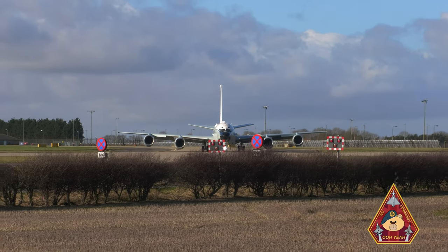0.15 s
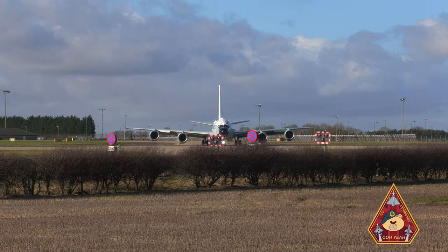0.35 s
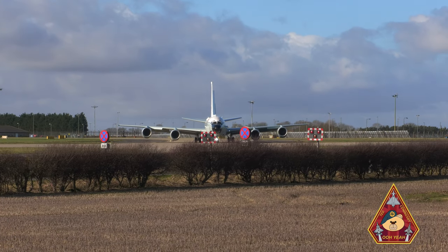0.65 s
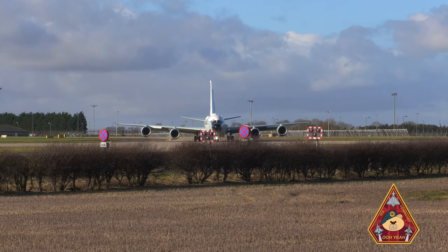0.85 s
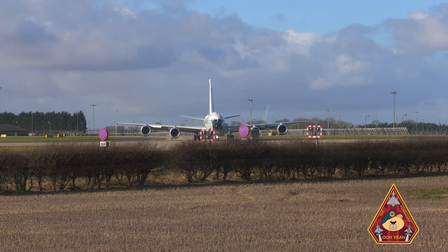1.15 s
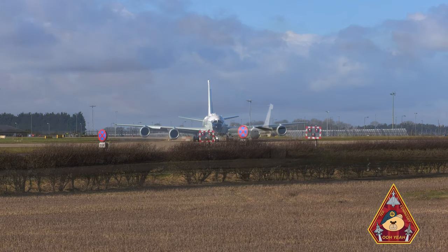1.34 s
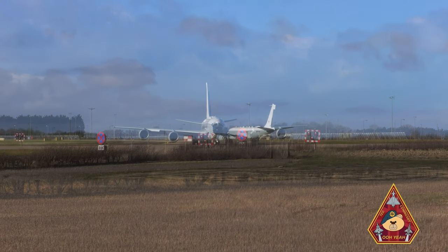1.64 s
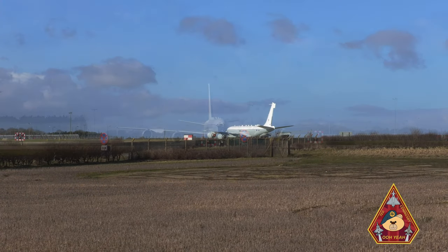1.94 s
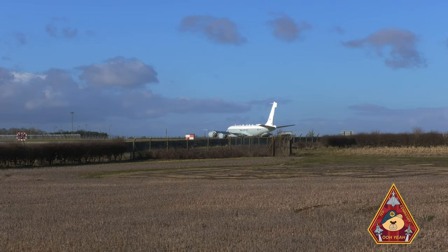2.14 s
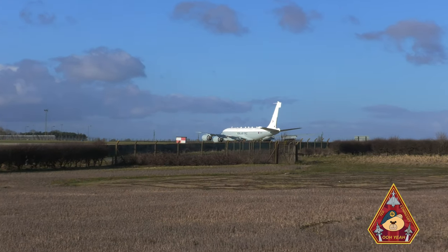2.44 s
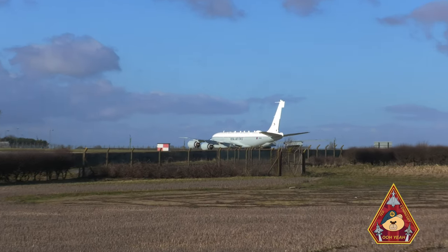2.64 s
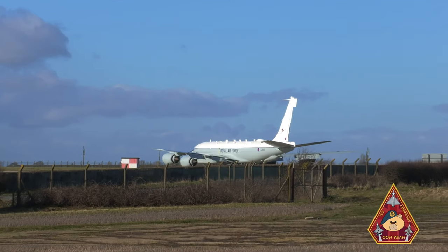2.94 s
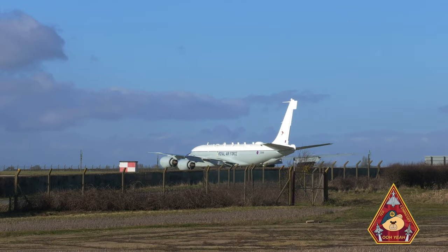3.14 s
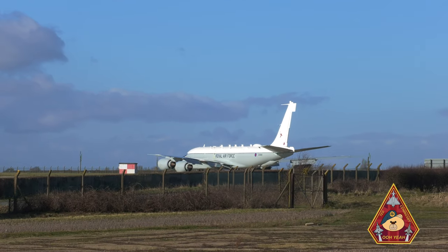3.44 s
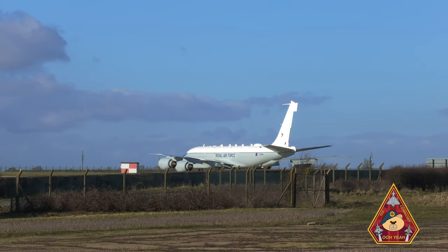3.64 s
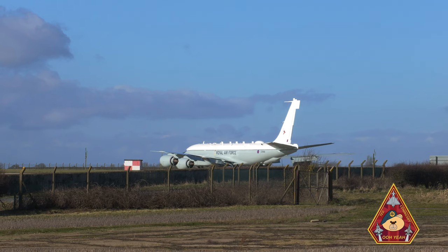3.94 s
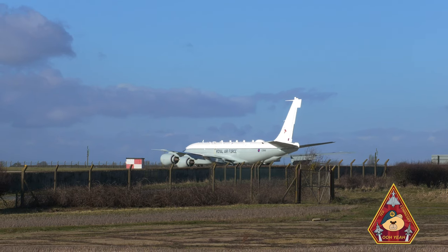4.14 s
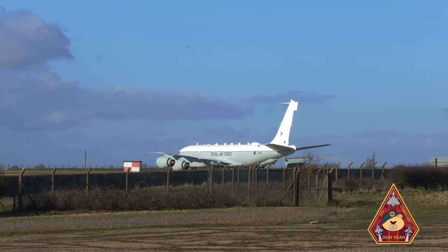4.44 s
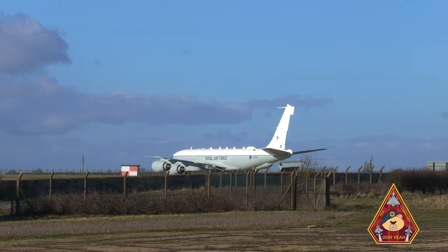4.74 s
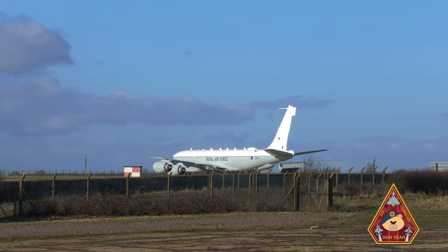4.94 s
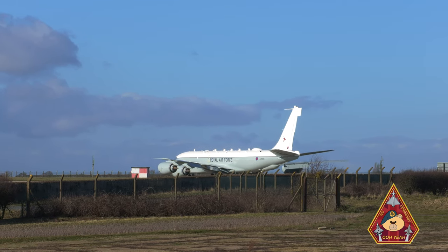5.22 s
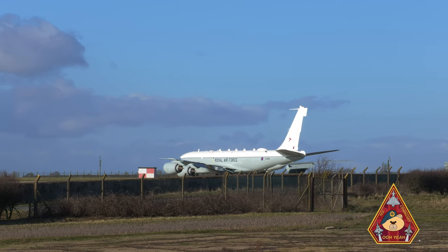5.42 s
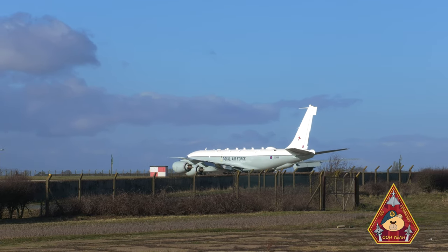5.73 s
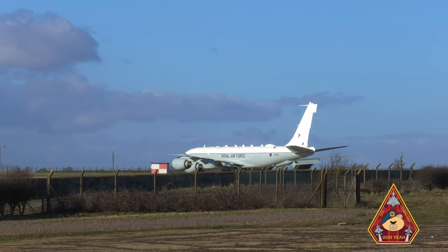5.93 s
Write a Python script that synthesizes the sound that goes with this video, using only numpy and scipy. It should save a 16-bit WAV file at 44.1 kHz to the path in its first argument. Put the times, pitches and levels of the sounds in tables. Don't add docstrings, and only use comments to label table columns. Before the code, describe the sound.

A taxiing four-engine jet heard far across open ground. First comes steady high whine and airy roar, brightening just after one second, then fading as the scene changes. The exhaust side follows, low and rough, with a hum that swells and fades by about five seconds. Wind buffets the unprotected-sounding handheld microphone throughout; dry clicks and rustles grow busier late, and a short bird chirp arrives at the end.

```python
import sys
import numpy as np
from scipy import signal
from scipy.io import wavfile
from scipy.ndimage import uniform_filter1d, minimum_filter1d

SR = 44100
rng = np.random.default_rng(int(sys.argv[2]) if len(sys.argv) > 2 else 0)


def undo_db(level):
    steps = np.asarray(level, float) / 20
    return 10 ** steps


def generate_wav(sig):
    pcm = np.round(np.clip(np.atleast_2d(sig).T, -1, 1) * 32767).astype(np.int16)
    wavfile.write(sys.argv[1], SR, pcm)


N = 268128


def evened(x):
    return x / np.sqrt(np.mean(x ** 2) + 1e-20)


def columns(rows):
    s, *values = np.transpose(rows)
    return [np.interp(np.arange(N) / SR, s, v) for v in values]


def fade(start_s, end_s):
    return np.clip((np.arange(N) / SR - start_s) / (end_s - start_s), 0, 1)


def bell(centre_s, length_s):
    return np.exp(-((np.arange(N) / SR - centre_s) / length_s) ** 2)


def wander(rate_hz):
    slow = signal.butter(2, rate_hz, fs=SR, output="sos")
    return evened(signal.sosfilt(slow, rng.standard_normal(N + SR))[SR:])


def noise(colour, band, patchy_db, tilt_db=np.zeros(N), size=1024):
    hop = size // 4
    frames, hz = N // hop + 5, np.fft.rfftfreq(size, 1 / SR)
    a, b, patches = rng.standard_normal((frames, len(hz), 3)).T
    patches = uniform_filter1d(patches, size=10, axis=0)
    patches = evened(uniform_filter1d(patches, size=14, axis=1))

    f, db = np.transpose(colour)
    f = np.r_[f[0] / 4, f, f[-1] * 3]
    db = np.r_[db[0] - 60, db, db[-1] - 120]
    gain = undo_db(np.interp(np.log(hz + 1), np.log(f), db))
    inside = (hz > band[0]) & (hz < band[1])
    share = np.sqrt(np.sum(gain[inside] ** 2) / np.sum(gain ** 2))

    octaves = np.log2(np.clip(hz[:, None], band[0], 5000) / band[0])
    tilt = tilt_db[np.clip(np.arange(frames) * hop, 0, N - 1)] * octaves
    plain = (a + 1j * b) * gain[:, None] * undo_db(patchy_db * patches)
    overlap = size - hop
    scale = np.std(signal.istft(plain, nperseg=size, noverlap=overlap)[1]) * share
    return signal.istft(plain * undo_db(tilt), nperseg=size, noverlap=overlap)[1][:N] / scale


def tone(hz, db, waver_hz, flutter_db, rate_hz):
    turns = np.cumsum(hz + waver_hz * wander(rate_hz)) / SR + rng.random()
    level = np.sqrt(2) * undo_db(db + flutter_db * wander(rate_hz))
    return level * np.sin(2 * np.pi * turns)


# time_s, hiss_level_db
GRIP = [(0.0, -75.5), (.45, -74.5), (1.15, -77.5), (1.45, -80.5), (2.04, -74), (2.28, -71.5), (2.45, -73.5),
        (2.78, -75.5), (3.18, -74.5), (3.6, -75.5), (3.72, -73.7), (3.9, -76.2), (4.12, -75), (4.35, -70.5),
        (4.58, -71.5), (5.0, -75), (5.4, -70.5), (6.0, -72)]
# pitch_hz, density_db (per Hz)
HISS_COLOUR = [
    [(8300, 0), (9500, -1), (12000, -2), (15500, -5)],
    [(6500, -1), (7700, 0), (8100, -5)],
]


def hiss():
    hiss_db, = columns(GRIP)
    rustle_db = -72.5 + 1.4 * (hiss_db + 74.5)
    rustle_db += 3.5 * (1 - fade(1.45, 1.75))
    out = undo_db(hiss_db) * noise(HISS_COLOUR[0], (8500, 15000), .8, size=512)
    out += undo_db(rustle_db - .8) * noise(HISS_COLOUR[1], (6800, 8100), 2.5, size=256)
    return out * undo_db(1.4 * wander(150))


def crackle():
    clicks_per_s = 60
    busy = np.clip((columns(GRIP)[0] + 73.5) / 2, 0, 1)
    clicks = rng.random(N) < busy * clicks_per_s / SR
    clicks = clicks * undo_db(4 * np.minimum(rng.exponential(1, N), 3))
    t = np.arange(200) / SR
    band = signal.butter(2, [6000, 13000], "bandpass", fs=SR, output="sos")
    click = signal.sosfilt(band, rng.standard_normal(200)) * undo_db(-60 * t / .006)
    return undo_db(-66) * signal.oaconvolve(clicks, click)[:N]


# start_s, peak_db, low_part_db
TICKS = [(0.1667, -59, -1), (0.234, -62, -2), (1.0078, -61, -4), (1.563, -61, -5), (2.1572, -62, -4),
         (2.2968, -59, -4), (3.6932, -57, -11), (3.7026, -54, -14), (3.7416, -53, -15), (4.2938, -55, -7),
         (4.3946, -54, 1), (4.5687, -40, -8), (4.5901, -45, -7), (4.6166, -52, -4), (4.7877, -53, -12),
         (5.1548, -56, 1), (5.2576, -46, -4), (5.3659, -57, -3), (5.3888, -51, -6), (5.4167, -55, -6),
         (5.4272, -53, -6), (5.4532, -54, -3), (5.6931, -54, -7), (5.8094, -54, -3), (5.8283, -53, -7),
         (5.8832, -50, -4), (5.8917, -49, -3), (5.9525, -43, -12), (5.9929, -53, -6), (6.0154, -49, -8)]


def ticks():
    out, t = np.zeros(N + 1000), np.arange(1000) / SR
    high = signal.butter(2, [8500, 13500], "bandpass", fs=SR, output="sos")
    low = signal.butter(2, [5200, 8200], "bandpass", fs=SR, output="sos")
    attack = np.minimum(t / .0012, 1)
    shape = attack * (undo_db(-60 * t / .018) + .18 * undo_db(-60 * t / .08))
    for (s, db, low_db), burst in zip(TICKS, rng.standard_normal((len(TICKS), 1000))):
        sound = evened(signal.sosfilt(high, burst))
        sound = sound + undo_db(low_db + 12) * evened(signal.sosfilt(low, burst))
        out[round((s - .001) * SR):][:1000] += undo_db(db - 5) * shape * sound
    return out[:N]


# start_s, length_s, start_pitch_hz, end_pitch_hz, level_db
CHIRPS = [
    (2.64, .2, 5730, 5770, -63),
    (5.995, .055, 2150, 2250, -42),
    (2.2, .12, 11750, 11700, -79),
]


def birds():
    out = np.zeros(N + SR)
    for s, length_s, start_hz, end_hz, db in CHIRPS:
        hz = np.linspace(start_hz, end_hz, round(length_s * SR))
        whistle = np.sin(2 * np.pi * np.cumsum(hz) / SR) * signal.windows.tukey(len(hz), .4)
        out[round(s * SR):][:len(hz)] += undo_db(db) * whistle
    return out[:N]


# time_s, strength_db (the gain each one costs)
GUSTS = [(2.075, 5), (2.2, 3), (2.315, 3.5), (2.445, 4), (2.7, 2.5), (2.85, 6.5), (3.04, 2.5), (3.31, 2),
         (3.47, 3.5), (3.65, 2), (3.76, 3.5), (3.89, 2), (4.038, 4.5), (4.275, 3), (4.545, 2), (4.78, 3.5),
         (4.845, 7), (4.89, 6), (5.0, 3), (5.05, 8), (5.228, 4.5), (5.28, 7.5), (5.533, 3.5), (5.708, 4),
         (5.975, 2.5), (6.035, 4.5)]


def gusts():
    out, t = np.zeros(N + SR), np.arange(-.03, .03, 1 / SR)
    swing = np.cos(2 * np.pi * 38 * t) * np.exp(-(t / .013) ** 2)
    for s, db in GUSTS:
        out[round((s - .028) * SR):][:len(t)] += .032 * db * swing
    return out[:N]


def ducking():
    t = np.arange(N) / SR
    drops_db = [np.where(t > s, db - 50 * (t - s), 0) for s, db in GUSTS]
    drop_db = np.max(drops_db, axis=0)
    return undo_db(-uniform_filter1d(drop_db, size=400))


# time_s, level_db
WIND = [(0.0, -30), (.16, -34.5), (.64, -22.5), (.94, -28.5), (1.15, -24), (1.58, -33.5), (1.92, -23),
        (2.24, -30.5), (2.4, -20), (2.56, -29), (2.72, -22.5), (3.36, -22.5), (3.55, -28), (4.0, -18),
        (4.46, -30), (5.1, -17.5), (5.56, -23.5), (5.9, -23)]
# pitch_hz, density_db (per Hz)
RUMBLE_COLOUR = [
    [(14, -7), (30, 0), (46, -1), (62, -7)],
    [(50, -7), (65, -1), (95, -2), (125, -8)],
    [(135, 0), (200, -3), (265, -5)],
]


def rumble():
    wind_db, = columns(WIND)
    low_db = -24 + 2.5 * fade(2.2, 2.7) + .39 * (wind_db + 24.5)
    upper_db = -31.5 + 4 * fade(1.8, 2.5) - 7 * bell(1.46, .2)
    wind = undo_db(wind_db) * noise(RUMBLE_COLOUR[0], (15, 55), .22, size=8192)
    low = undo_db(low_db) * noise(RUMBLE_COLOUR[1], (55, 130), .55, size=8192)
    upper = undo_db(upper_db) * noise(RUMBLE_COLOUR[2], (135, 265), .14, size=4096)
    return wind + low + upper


# time_s, level_db
EXHAUST = [(1.92, -29.5), (2.1, -32), (2.4, -32.5), (3.02, -31), (3.2, -29), (3.45, -30.5), (3.75, -28),
           (4.05, -30.5), (4.65, -29), (5.0, -30), (5.4, -29), (5.75, -26.5), (6.08, -25.5)]
# pitch_hz, density_db (per Hz)
EXHAUST_COLOUR = [(280, -8), (340, -3), (430, -5), (510, -14), (720, -11), (950, -12), (1500, -16),
                  (2000, -24), (2400, -23), (3600, -33), (4400, -42), (5600, -45), (6300, -54)]
# time_s, level_db
LOWER_PIPE = [(2.0, -29.5), (2.5, -35), (3.1, -25), (3.4, -29), (3.7, -24), (3.9, -32), (5.05, -21.5),
              (6.08, -33.5)]


def exhaust_roar():
    level_db, = columns(EXHAUST)
    thrust_db = level_db + 30
    brightness_db = .3 - .18 * thrust_db
    out = undo_db(level_db) * noise(EXHAUST_COLOUR, (900, 3500), 1.07, brightness_db)
    upper_db, lower_db = -28.5 + 1.3 * thrust_db, columns(LOWER_PIPE)[0]
    for db, hz, width_hz in [(upper_db, 730, 230), (lower_db, 342, 75)]:
        band = signal.butter(2, [hz - width_hz / 2, hz + width_hz / 2], "bandpass", fs=SR, output="sos")
        out += undo_db(db - 2.5) * evened(signal.sosfilt(band, rng.standard_normal(N)))
    return out * fade(1.27, 2.26)


# time_s, level_db, pitch_hz
HUM = [(1.35, -46, 400.8), (1.52, -29, 402), (1.7, -24, 404), (2.1, -16.5, 407), (2.65, -20.5, 408.2),
       (2.9, -29, 410.1), (3.2, -28.5, 410.8), (3.3, -26, 411), (3.7, -25.5, 414), (3.8, -18, 413.7),
       (4.3, -21, 413), (4.4, -18.5, 415), (4.5, -22.5, 418), (4.75, -28.5, 419), (4.9, -34.5, 422.5),
       (5.1, -36, 417)]


def combustion_hum():
    hum_db, hum_hz = columns(HUM)
    rougher = fade(2.6, 3)
    hum = tone(hum_hz, hum_db + .6, 2.5 + 3.5 * rougher, 1.5 + 1.1 * rougher, 16)
    hum = hum * fade(1.3, 1.4) * (1 - fade(4.95, 5.1))
    second_db = -34 + .58 * (hum_db + 24) - 2.5 * (np.arange(N) / SR - 3)
    second = tone(1.075 * hum_hz, second_db, 3, 3, 8)
    return hum + second * fade(1.5, 1.8) * (1 - fade(4.2, 4.5))


FAN_HZ = [
    1346,
    1367,
    1385,
]
# blade_tone_db, octave_db, drift_db (a second)
FANS = [
    (-32, -43, -5),
    (-31.5, -48, 0),
    (-28.5, -46, -1),
]
# time_s, fan_number, length_s, blade_tone_gain_db, octave_gain_db
BEAMS = [(0.0, 0, .1, 5.5, 2), (.45, 0, 0.073, 6, 10), (0.657, 0, 0.14, -3, 9), (.92, 0, 0.11, 9, 7),
         (1.151, 0, 0.11, 8.5, 8), (0.05, 1, .1, 6, 6), (.95, 1, .1, -3, 19), (1.25, 1, .19, 11, 17),
         (1.55, 1, .2, 5, 6), (0.055, 2, .08, 9, 6.5), (.6, 2, 0.17, 4, 1.5), (0.752, 2, 0.14, -0.5, 10),
         (1.1, 2, 0.11, -0.5, 13), (1.398, 2, .12, -0.5, 7)]


def fans():
    t, out = np.arange(N) / SR, np.zeros(N)
    sink_db = 59.5 * np.clip(t - 1.68, 0, 1)
    for k, (hz, (blade_db, octave_db, drift_db)) in enumerate(zip(FAN_HZ, FANS)):
        beams = [(bell(s, length_s), a, b) for s, fan, length_s, a, b in BEAMS if round(fan) == k]
        slow_db = drift_db * np.minimum(t, 2) - sink_db
        blade_swell_db = sum(a * swell for swell, a, b in beams)
        octave_swell_db = sum(b * swell for swell, a, b in beams)
        out += tone(hz, blade_db + slow_db + blade_swell_db, 2.6, 2, 18)
        out += tone(2 * hz, octave_db + 2 + slow_db + octave_swell_db, 3, 2, 9)
    return out


# time_s, level_db, brightness_db (an octave)
INTAKE = [
    (0.0, -24.5, 1.7),
    (.25, -21, 1),
    (.7, -22.5, 1.5),
    (.95, -21.5, 3),
    (1.2, -22, 5.5),
    (1.35, -23.5, 5),
    (1.5, -24, 2),
    (1.85, -34.5, -1.5),
    (2.2, -45, -3),
]
# pitch_hz, density_db (per Hz)
INTAKE_COLOUR = [(280, -7), (330, -1), (420, -5), (600, -8), (1000, -3), (1350, -2), (1850, -3), (2600, -6),
                 (3000, -12), (3900, -14.5), (4500, -26), (5600, -34), (6500, -48), (8200, -63)]
# pitch_hz, level_db
SHAFT_TONES = [
    (942, -42),
    (2369, -44),
    (312, -41),
    (4099, -58),
]


def nose_on():
    level_db, brightness_db = columns(INTAKE)
    out = undo_db(level_db) * noise(INTAKE_COLOUR, (1500, 2600), 1.19, brightness_db - 3.5)
    out += fans()
    compressor = tone(5188 - 16 * fade(0, 1.1), -63 + 1.6 * brightness_db, 5, 3.5, 12)
    out += compressor * (1 - fade(1.55, 1.85))
    shafts = sum(tone(hz, db, 4, 3, 8) for hz, db in SHAFT_TONES)
    out += shafts * (1 - fade(1.4, 1.9))
    return out * (1 - fade(1.9, 2.2))


def scene():
    roar = exhaust_roar()
    steady = combustion_hum() + nose_on() + rumble() + gusts() + ticks()
    ducked = roar + birds() + hiss() + crackle()
    return (steady + ducked * ducking())[None]


def top_cut(x):
    return signal.sosfilt(signal.butter(12, 15760, fs=SR, output="sos"), x)


def record(dry):
    ceiling = .53 - .1 * fade(1.4, 2)
    over_db = np.maximum(20 * np.log10(abs(dry[0]) / ceiling + 1e-9), 0)
    fall_db = np.arange(N) * 110 / SR
    held_db = np.maximum.accumulate(over_db + fall_db) - fall_db
    ahead_db = uniform_filter1d(-minimum_filter1d(-held_db, size=89), size=88)
    mix = dry / undo_db(ahead_db) + .0058
    edge = signal.firwin(511, 15760, window=("kaiser", 9), fs=SR)
    mix = signal.oaconvolve(mix, edge[None], "same")
    return top_cut(mix)


dry = scene()
out = record(dry)
generate_wav(out)
```